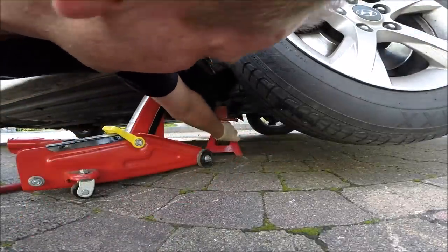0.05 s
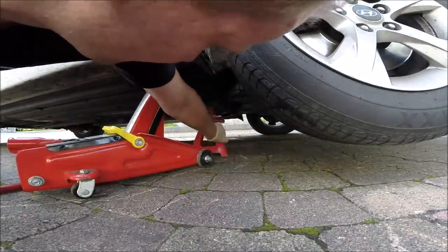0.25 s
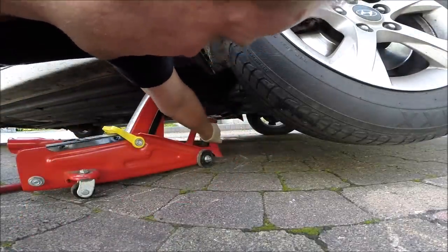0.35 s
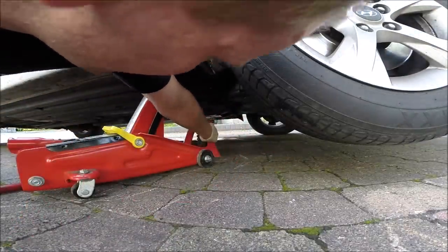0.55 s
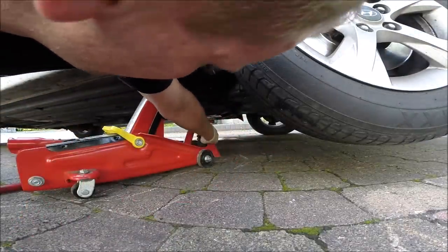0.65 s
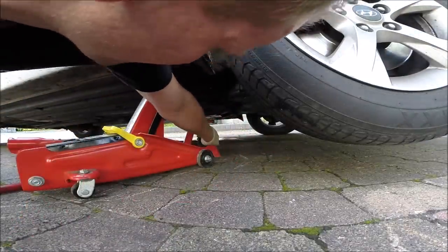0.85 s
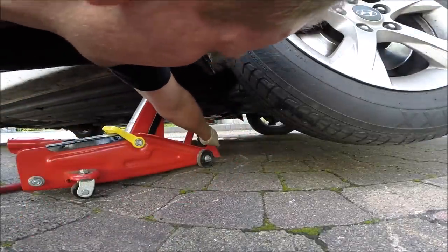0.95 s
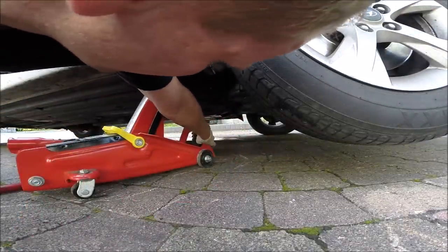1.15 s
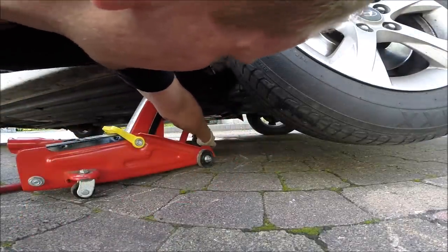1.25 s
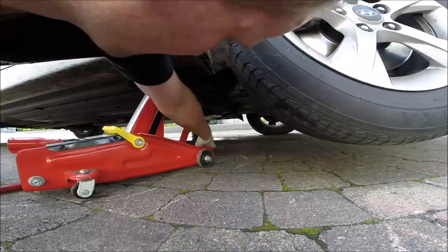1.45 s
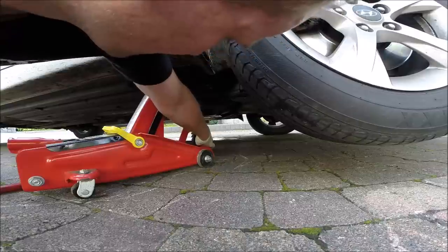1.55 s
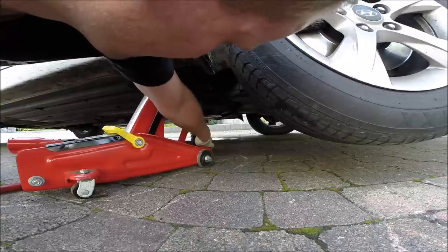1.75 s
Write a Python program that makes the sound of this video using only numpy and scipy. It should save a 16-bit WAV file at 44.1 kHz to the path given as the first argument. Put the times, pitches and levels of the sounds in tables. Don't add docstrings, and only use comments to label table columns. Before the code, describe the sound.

Close up beneath a raised car outdoors, metal feet scrape stone blocks with a harsh, bright, juddering grind, pause, scrape again briefly and softer, then barely shift; small pin ticks and faint traffic hum.

```python
import sys
import numpy as np
from scipy import signal
from scipy.fft import rfft, irfft
from scipy.io import wavfile
from scipy.ndimage import uniform_filter1d

SR = 44100
rng = np.random.default_rng(int(sys.argv[2]) if len(sys.argv) > 2 else 0)


def bounce(signal):
    frames = np.transpose(np.atleast_2d(signal))
    limited = np.clip(frames, -1, 1)
    pcm = np.round(limited * 32767).astype(np.int16)
    wavfile.write(sys.argv[1], SR, pcm)


def elevation(decibels):
    levels = np.asarray(decibels, float)
    return 10 ** (levels / 20)


N = 79380
T = np.arange(N) / SR


def unit(x):
    return x / np.sqrt(np.mean(x ** 2) + 1e-30)


def mode(x, hz, width):
    r = np.exp(-np.pi * max(width, 2) / SR)
    pole = r * np.exp(2j * np.pi * hz / SR)
    return signal.lfilter([np.sqrt(1 - r * r)], [1, -pole], x).imag


def colour(x, table):
    f = np.fft.rfftfreq(len(x), 1 / SR) + 1
    points = np.array(table)
    gain_db = np.interp(np.log(f), np.log(points[:, 0]), points[:, 1])
    return irfft(rfft(x) * elevation(gain_db), len(x))


def walk(rate):
    k = int(SR / rate)
    values = 2 * np.tanh(.7 * rng.standard_normal(400))
    return uniform_filter1d(np.repeat(values, k), k)[:N]


def burst(s, t60, rise=0.00032):
    d = np.maximum(T - s, 0)
    return (1 - np.exp(-d / rise)) * elevation(-60 * d / t60)


def tail(t60, size=8820):
    x = rng.standard_normal(size) * burst(0, t60)[:size]
    return x / np.linalg.norm(x)


# pitch_hz [Hz], level_db [dB per Hz]
TRAFFIC_SPECTRUM = [(15, -39.5), (25, 1.5), (82, -5), (137, -7), (354, -8), (988, -14), (1560, -23.5),
                    (9000, -41.5), (14000, -54.5), (16000, -56)]


def traffic():
    level_db, swell_db, flicker_db = -47, .4, .9
    base = rfft(colour(rng.standard_normal(N), TRAFFIC_SPECTRUM))
    swell, out = walk(1.6), 0
    octave = np.log2(np.fft.rfftfreq(N, 1 / SR) / 30 + 1e-9)
    for k in range(11):
        band = irfft(base * np.clip(1 - np.abs(octave - k), 0, 1), N)
        out = out + band * elevation(swell_db * swell + flicker_db * walk(13.88))
    return unit(out) * elevation(level_db)


PIN_START_S = [.0108, .0108, .1055, .108, 1.452, .608, .1185]
# level_db [dB], centre_hz [Hz], width_hz [Hz], t60_s [s]
PIN_TICKS = [(-34, 6550, 1000, 0.037), (-34.5, 6700, 13000, 0.028), (-46.5, 6200, 1690, 0.038),
             (-36, 1700, 690, 0.035), (-51, 3080, 2700, 0.032), (-43, 1700, 2500, 0.045),
             (-28, 1500, 4000, .06)]


def pin_ticks():
    out = 0
    for s, (db, hz, width, t60) in zip(PIN_START_S, PIN_TICKS):
        rattle = mode(mode(rng.standard_normal(N), hz, width), hz, 2 * width)
        out = out + elevation(db) * burst(s, t60) * unit(rattle)
    return out


# pitch_hz [Hz], level_db [dB], t60_s [s]
KNOCK_MODES = [(980, -9.5, 0.08), (1440, -6.5, 0.069), (1963, -6, 0.06), (2790, -7, 0.014),
               (4180, -15.5, 0.053), (4610, -16.5, 0.058)]


def knock():
    start_s, level_db, push_t60_s = .1185, -21, 0.003
    bounces = ((0, -0.5), (.003, 1), (.007, -1))  # (delay s, dB)
    push = sum(elevation(db) * burst(start_s + s, push_t60_s, 1e-5) for s, db in bounces)
    push = np.diff(push, prepend=0)
    push = signal.sosfilt(signal.butter(3, 5500, fs=SR, output="sos"), push)
    ring = 0
    for hz, db, t60 in KNOCK_MODES:
        t60 = min(t60, .15)
        ring = ring + elevation(db) * mode(push, hz, 3.4 / t60) * np.sqrt(t60)
    return elevation(level_db) * ring / np.abs(ring).max() * 2


def sing(rows, waver):
    out, d = np.zeros(N + SR), T[:SR // 2]
    for s, db, hz, t60, rise in rows:
        i = int(s * SR)
        own_waver = np.roll(waver, int(7 * hz))[:len(d)]
        envelope = elevation(db - 60 * d / t60 + own_waver) * (1 - np.exp(-d / rise))
        out[i:i + len(d)] += envelope * np.sin(2 * np.pi * hz * (d + s))
    return out[:N]


LOOSE_START_S = [.584, .98, .507, 1.63, 1.24, .353, .326, .372, 1.634, 1.087, 1.14, .43, .545, .266, .225,
                 .119]
# level_db [dB], pitch_hz [Hz], t60_s [s]
LOOSE_RINGS = [(-51, 4220, 0.12), (-41, 610, 0.3), (-10, 165, 0.056), (-32.5, 139.7, 0.36),
               (-32, 131, 0.25), (-35.5, 6000, 0.064), (-28, 6400, 0.07), (-13, 5190, 0.042),
               (-35, 6320, 0.041), (-43, 4900, 0.037), (-30.5, 9250, 0.029), (-22, 180, 0.082),
               (-29, 160.5, 0.2), (-40, 7200, 0.072), (-19.5, 958, 0.08), (-38, 950, 0.081)]
# start_s [s], level_db [dB], pitch_hz [Hz],
# t60_s [s]
FRAME_CHIMES = [(0.23, -17.5, 3150, .06), (0.22, -14.5, 2970, 0.074), (0.27, -14, 3670, .08),
                (0.269, -11, 2780, .06), (0.26, -19, 5070, 0.066), (.283, -18, 1990, .05),
                (.305, -22, 2950, .05), (0.34, -18.5, 1970, 0.17), (.352, -8.5, 2295, 0.067),
                (0.34, -12, 2900, .07), (.362, -24, 3130, .1), (0.38, -16.5, 1720, .15),
                (0.36, -15, 3400, 0.087), (.486, -37, 7950, 0.12), (0.47, -41, 8200, 0.13),
                (0.42, -48, 12600, 0.28), (.415, -53, 13000, 0.13), (0.45, -56, 11000, 0.1),
                (1.087, -36.5, 8500, 0.041), (1.085, -32, 2930, 0.05), (1.141, -29, 3960, 0.25),
                (1.182, -21.5, 1222, 0.034), (1.634, -28, 2550, 0.037), (1.634, -37.5, 3600, .06),
                (1.635, -42, 3900, .07), (1.636, -48, 11160, 0.051), (1.636, -53, 7620, .06),
                (.119, -46.5, 170, 0.09), (0.17, -33, 880, 0.15), (0.26, -32.5, 955, 0.28),
                (0.19, -19, 2590, .2), (0.17, -31, 3250, 0.11), (1.667, -37, 2600, .06),
                (1.686, -43, 2620, 0.054), (0.13, -40, 430, 0.12), (1.07, -34, 3100, 0.049),
                (1.206, -30, 850, 0.12), (1.148, -24.5, 238, 0.13), (.407, -23, 5600, 0.057),
                (1.17, -30, 2400, 0.11)]


def chimes():
    rise_s, waver_db = 0.0018, 2.5
    loose = [(s, *row, rise_s * max(1, 10 * row[2])) for s, row in zip(LOOSE_START_S, LOOSE_RINGS)]
    struck = [(*row, rise_s) for row in FRAME_CHIMES]
    return sing(struck + loose, waver_db * walk(70)[:SR // 2])


CONTACT_PER_S = 45


def slips():
    per_s, scatter_db, cap = 4000, 4, .04
    chance, sign, size = rng.random((3, N))
    return unit((chance < per_s / SR) * np.sign(sign - .5) * elevation(-scatter_db * np.log(size + cap)))


# time_s [s], scrape_db [dB], block_weight_db [dB re scrape],
# grit_bite_db [dB re scrape], favoured_hz [Hz]
FIRST_DRAG = [
    [(0.125, -38, 17, 4, 2420), (0.155, -38.5, -8, 5.5, 3020), (0.2, -25.5, 1.5, 2, 2670),
     (0.232, -24.5, -0.5, 1, 2880), (0.276, -17, -5.5, -7.5, 3000), (0.33, -16, -5, -1, 2850),
     (0.36, -17, -13, -7.5, 2610)],
    [(0.36, -12.5, -10, -1.5, 2910), (0.42, -21, 2, 3, 3020), (0.495, -28.5, 8.5, -1, 3540),
     (0.506, -26, 7, -7, 3070), (0.518, -31.5, 8.5, 8.5, 3120), (0.55, -41.5, 16, 0, 2640),
     (0.58, -46, 3.5, -13, 1980), (0.64, -59.5, 24, -5, 1900)],
]
SECOND_DRAG = [(1.049, -61, 12, 2.7, 2850), (1.082, -42, 17, 2.5, 3050), (1.09, -37, 10, 3.7, 2970),
               (1.141, -33, 11.5, 2, 3570), (1.165, -31, 8.03, 1.7, 3750), (1.188, -35, 7.7, 8.7, 3536),
               (1.23, -40.5, 17.1, 4.7, 3000), (1.27, -49, 11.6, 6.8, 2960), (1.341, -67, 22, 3.9, 2730)]
THIRD_DRAG = [(1.6, -66.5, 18, 6.1, 2780), (1.63, -48.5, 13, 4, 2600), (1.639, -46, 9.3, 13, 2600),
              (1.655, -49.5, 13.4, 7.4, 2640), (1.695, -44.5, 13.3, 8.8, 3270),
              (1.734, -61, 13, 11.6, 2990), (1.77, -87, 31, 10, 2990)]


def controls():
    out = np.zeros((4, N))
    for points in map(np.array, (*FIRST_DRAG, SECOND_DRAG, THIRD_DRAG)):
        db, weight, bite, hz = (np.interp(T, points[:, 0], points[:, k]) for k in (1, 2, 3, 4))
        during = (T >= points[0, 0]) & (T < points[-1, 0])
        out = np.where(during, [elevation(db), elevation(db + weight), elevation(db + bite), hz], out)
    return out


def lean(hz, lev, weight, favoured):
    leg_hz, leg_share, favour_db, favour_oct = 1500, 0.55, 10, .27
    if hz < leg_hz:
        return lev * (weight / (lev + 1e-12)) ** leg_share
    away_oct = np.log2(hz / (favoured + 1))
    return lev * elevation(favour_db * np.exp(-(away_oct / favour_oct) ** 2))


# start_s [s], peak_db [dB], brightest_hz [Hz]
FOOT_SNAGS = [(0.1866, -27.5, 3000), (0.1993, -24, 2700), (0.2244, -12, 2490), (0.2674, -13, 3350),
              (0.2889, -9.5, 2738), (0.303, -12.5, 2780), (0.3226, -5.5, 2740), (0.3413, -3.5, 2170),
              (0.354, -4, 2500), (0.371, -10, 1760), (0.3775, -18.5, 2870), (0.4091, -11, 2990),
              (0.4194, -15, 2600), (0.4596, -12.5, 3200), (0.4868, -17, 3320), (0.5102, -13, 1500),
              (0.5653, -22, 1500), (1.074, -40, 2080), (1.0861, -20, 2880), (1.111, -21, 3110),
              (1.139, -19, 3300), (1.1839, -17.5, 2480), (1.2166, -24, 3070), (1.6185, -35, 2300),
              (1.6346, -27.5, 3400), (1.667, -36, 5000), (1.6855, -30, 3700), (1.7017, -34, 3490)]


def snag_kicks():
    level_db, length_s = -16, 0.0026
    hiss = rng.standard_normal(N)
    return np.array([burst(s, 7 * length_s) * elevation(db + level_db) for s, db, _ in FOOT_SNAGS]) * hiss


SNAG_HZ = np.array(FOOT_SNAGS)[:, 2]
SHEET_T60_S = .085


def thin_modes(hz, count=10):
    t = T[:8820]
    place, phase = rng.random((2, count, 1))
    tones = np.sin(2 * np.pi * (hz * 2 ** (place - .5) * t + phase))
    x = np.sum(tones, 0) * elevation(-60 * t / SHEET_T60_S)
    return x / np.linalg.norm(x) * np.sqrt(hz / SR)


# pitch_hz [Hz], level_db [dB per Hz]
GRIT_SPECTRUM = [(180, -31), (300, -4.5), (959, -1), (1110, -2), (1330, 2), (3550, -5), (4180, -11.5),
                 (5010, -11), (15000, -37)]


def sheet(ctl, kicks):
    contact_db, snag_db, snag_fall_db_oct, top_bite = 4.5, -4, 13, 1.7
    lev, weight, bite, favoured = ctl
    out, ref = 0, np.sqrt(np.mean(colour(slips(), GRIT_SPECTRUM) ** 2))
    half_octave = 2 * np.log2(np.fft.rfftfreq(N, 1 / SR) / 300 + 1e-9)
    for k in range(13):
        hz = 300 * 2 ** (k / 2)
        if k < 8:
            env = lean(hz, lev, weight, favoured)
        else:
            env = lev * (bite / (lev + 1e-12)) ** (1 if k < 10 else top_bite)
        near = elevation(snag_db - snag_fall_db_oct * np.abs(np.log2(hz / SNAG_HZ)))
        push = env * elevation(contact_db * walk(CONTACT_PER_S)) * slips() + near @ kicks
        if k > 4:
            ring = tail(SHEET_T60_S)
            if k >= 9:
                ring = .5 * ring + thin_modes(hz)
            push = signal.fftconvolve(push, ring)[:N]
        out = out + rfft(push) * np.sqrt(np.clip(1 - np.abs(half_octave - k), 0, 1))
    return colour(irfft(out, N), GRIT_SPECTRUM) / ref


# pitch_hz [Hz], level_db [dB]
RIM_MODES = [(7350, -25.5), (7580, -4), (8250, -9), (8490, -0.5), (9520, -4.5), (10200, -14), (11000, 1),
             (11900, 1), (12600, 0), (13200, -12), (14100, -8), (14900, -9.5)]


def rim(bite):
    level_db, width_hz, fall_db_oct, contact_db = -39, 54, 19.5, 4
    out = 0
    for hz, db in RIM_MODES:
        push = bite * elevation(contact_db * walk(CONTACT_PER_S / 2)) * rng.standard_normal(N)
        gain = 4 * elevation(level_db + db - fall_db_oct * np.log2(hz / 8000))
        out = out + gain * mode(push, hz, width_hz)
    return out


# pitch_hz [Hz], width_hz [Hz], level_db [dB]
FRAME_MODES = [(844, 140, 4.5), (961, 26, 9), (1405, 130, 3.5), (1714, 21.9, 6.5), (1960, 60, -20),
               (2312, 110, -3), (2587, 64, 2.5), (2780, 57, -6.5), (2990, 81, 2), (3466, 180, -4.5),
               (3667, 46, 5), (3770, 33, -12), (3870, 62, -7)]
# pitch_hz [Hz], width_hz [Hz], level_db [dB]
POST_MODES = [(4797, 120, 4), (4950, 46, -0.5), (5210, 150, -9), (5560, 158, -14), (5860, 38, 6.5),
              (6140, 24, -1.5), (6306, 42, 10), (6110, 96, -17.5), (7460, 48, -24), (8020, 28, -3),
              (9180, 30, -4), (9310, 34, -0.5)]
# pitch_hz [Hz], width_hz [Hz], level_db [dB]
BLOCK_MODES = [(123.7, 20, -10.5), (175.3, 20.6, -1.5), (232.3, 41.4, 2), (319, 80, -4.5), (446, 80, -11),
               (548, 99, -12.5)]


def drag():
    grit_db, snag_oct, narrow, min_width_hz, foot_hz = -6, 0.82, 0.74, 24, 111.8
    lev, weight, bite, favoured = ctl = controls()
    shared, kicks = slips(), snag_kicks()
    # modes, drive, level dB, contact shift dB, felt by snags
    bodies = ((FRAME_MODES, lev, -2.5, 1, 1), (POST_MODES, bite, -11.5, 1, 1),
              (BLOCK_MODES, weight, -3, 1, 0))
    out = 0
    for table, drive, db, contact_db, snagged in bodies:
        modes = np.array(table)
        norm = np.sqrt(np.sum(elevation(modes[:, 2]) ** 2 * modes[:, 1]) / 100)
        for hz, width, g in table:
            env = lean(hz, lev, weight, favoured) if table is FRAME_MODES else drive
            contact = elevation(contact_db * walk(CONTACT_PER_S))
            two_feet = (shared + np.roll(shared, rng.integers(N))) / 2
            push = env * contact * two_feet
            near = snagged * elevation(-6 * (np.log2(hz / SNAG_HZ) / snag_oct) ** 2 + 10.5)
            gain = elevation(db + g) * np.sqrt(width / 100) / norm
            out = out + gain * mode(push + 4 * near @ kicks, hz, max(narrow * width, min_width_hz))
    out = out + elevation(grit_db) * sheet(ctl, kicks) + rim(bite)
    return signal.sosfilt(signal.butter(4, foot_hz, "high", fs=SR, output="sos"), out)


def scene():
    echo_db, echo_t60_s, yard_db, yard_t60_s = -11, 0.13, -36, 0.77
    near = drag() + knock() + pin_ticks() + chimes()
    echo = elevation(echo_db) * signal.fftconvolve(near, tail(echo_t60_s))[:N]
    yard = elevation(yard_db) * signal.fftconvolve(near, tail(yard_t60_s, size=44100))[:N]
    return (near + echo + yard + traffic())[None]


def roll_off(x):
    return signal.sosfilt(signal.butter(12, 16360, fs=SR, output="sos"), x)


def record(dry):
    top_hz = 15100
    mix = signal.sosfilt(signal.ellip(8, .2, 60, top_hz, fs=SR, output="sos"), dry)
    return roll_off(mix)


dry = scene()
out = record(dry)
bounce(out)
```